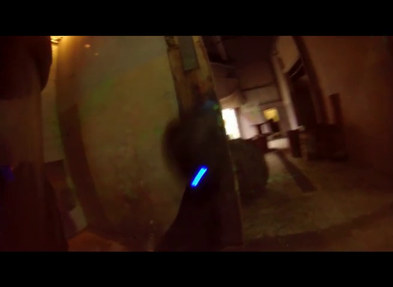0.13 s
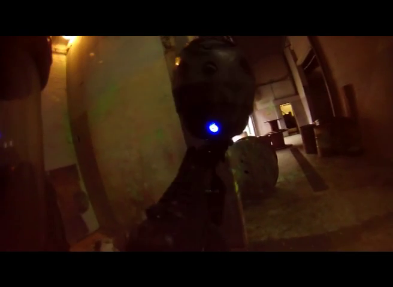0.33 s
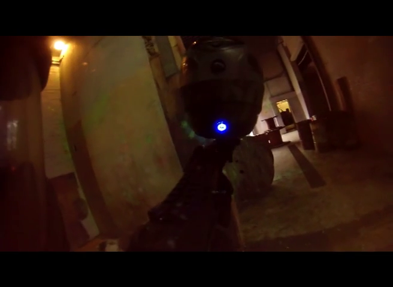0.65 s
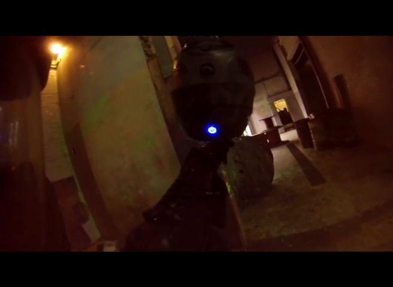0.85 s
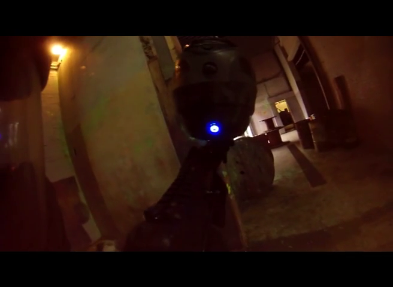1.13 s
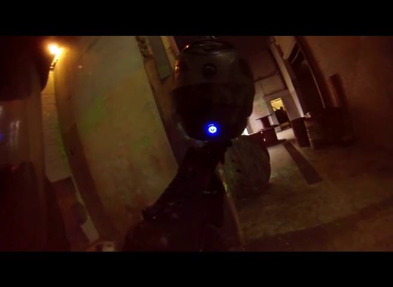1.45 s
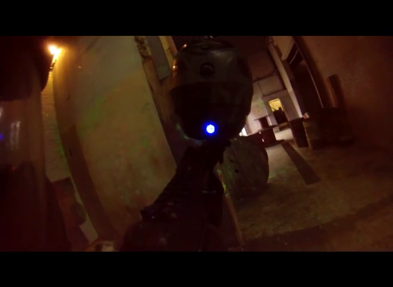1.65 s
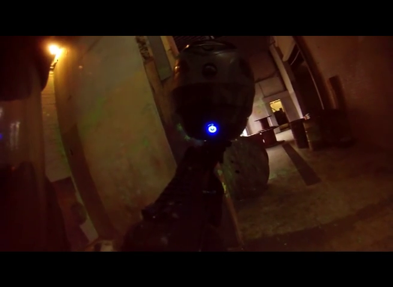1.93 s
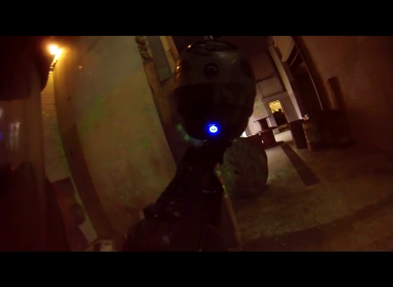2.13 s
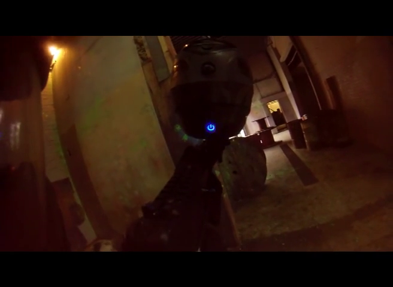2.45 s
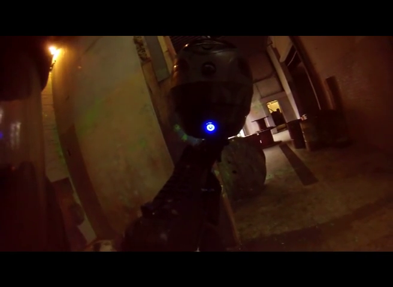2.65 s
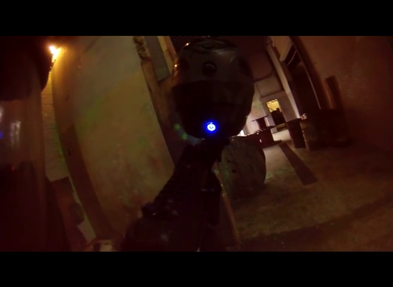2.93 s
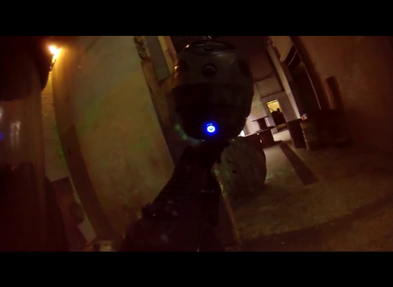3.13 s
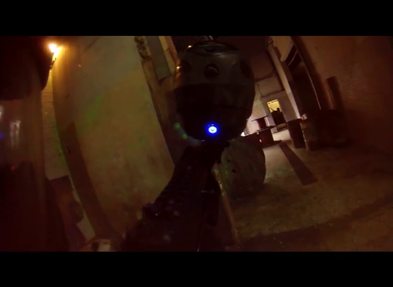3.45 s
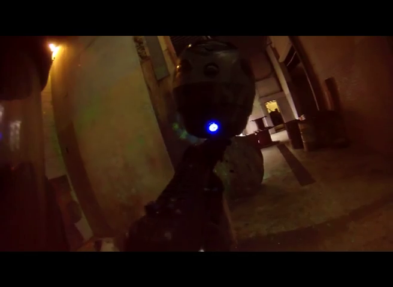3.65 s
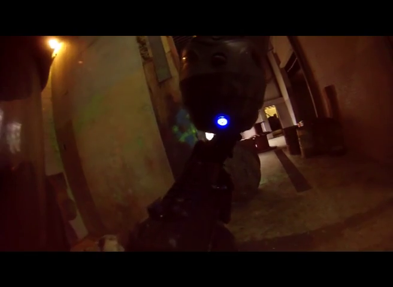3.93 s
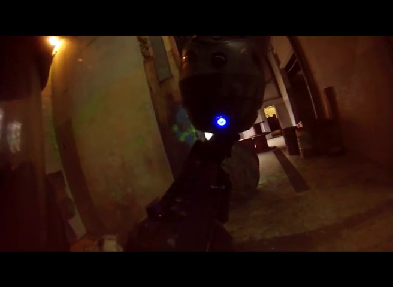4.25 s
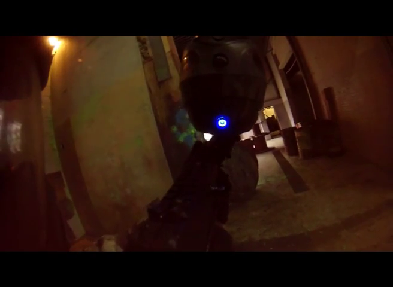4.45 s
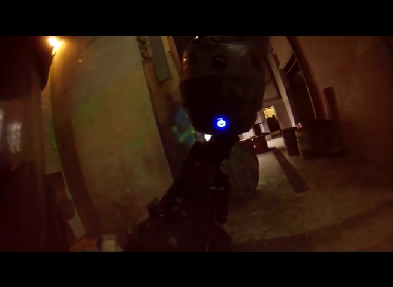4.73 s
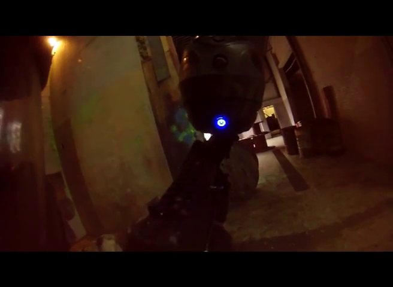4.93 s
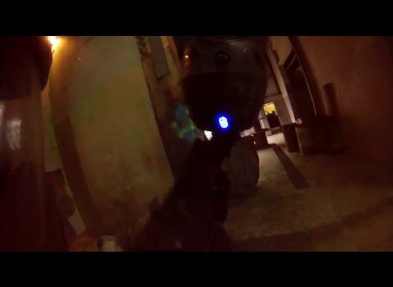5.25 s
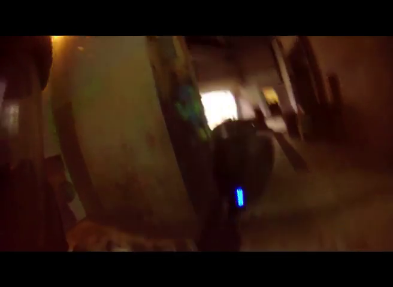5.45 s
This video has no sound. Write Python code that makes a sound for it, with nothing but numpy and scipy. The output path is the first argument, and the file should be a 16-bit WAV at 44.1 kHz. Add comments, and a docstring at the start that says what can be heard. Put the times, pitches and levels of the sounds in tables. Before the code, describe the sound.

In a large, echoing hall, distant paintball fire pulses softly over a faint hiss and light handling bumps. Then a marker next to the microphone fires two quick shots and ten more at an even, slightly slowing pace. Every shot is a hard crack of air that overloads the microphone, joined by the click and knock of the bolt and a dull shudder of the mount. The far firing thins toward the end.

```python
"""Paintball marker in an indoor arena

Twelve single shots, right beside a cased camera on a hand-held mount. In each, the sear clicks, the air
blast bounces in the barrel and overloads the microphone, the bolt knocks back and the next ball ticks
into the breech. The kicks shake the mount. Far across the large hall, strings of fire pile up into
a pulsing din, which dies away near the end."""
import sys
import numpy as np
from scipy import signal
from scipy.fft import rfft, irfft
from scipy.io import wavfile

SR = 44100
rng = np.random.default_rng(int(sys.argv[2]) if len(sys.argv) > 2 else 0)


def int16_out(signal):
    """Quantize to a 16-bit WAV file."""
    q = np.round(np.clip(np.atleast_2d(signal).T, -1, 1) * 32767)
    wavfile.write(sys.argv[1], SR, q.astype(np.int16))


N = 246959

# shots beside the microphone: blast t/s, relative level/dB, bolt stop t/s, its relative kick/dB
SHOTS = [(0.6157, 4.5, 0.6416, -1), (0.8474, 5, 0.8673, -3), (1.2707, 5, 1.3002, 1.5),
         (1.6619, 3.5, 1.6846, -1), (2.025, 4.5, 2.0482, 0), (2.4189, 4.5, 2.4486, 1.5),
         (2.86, 6, 2.8819, 0.5), (3.3924, 5.5, 3.4151, -2.5), (3.8981, 7, 3.9166, 1),
         (4.3605, 5.5, 4.3815, 0.5), (4.7969, 5, 4.822, -2), (5.2616, 3, 5.2902, -23)]
# the blast and its returns along the barrel: delay t/s, relative level/dB, high-pass f/Hz, low-pass f/Hz
BARREL_BOUNCES = [(0, 7.5, 3150, 2960), (.00235, 5, 152, 2280), (.00505, -2.5, 150, 12000),
                  (.00765, -9.5, 1000, 4930)]
# resonances of the air blast: f/Hz, relative level/dB, t60/s
BLAST_MODES = [(598, -15, 0.0079), (873, -8.5, 0.016), (968, -3.5, 0.013), (1423, -12, 0.04),
               (1805, -11.5, 0.02), (2517, -7, 0.0069), (3048, -1.5, 0.0074), (2540, -13.5, 0.0068),
               (502, -24.5, 0.055), (3245, -14.5, 0.02)]
# bright edge of contacts and escaping air, close up: f/Hz, gain/dB
CRACK_SPECTRUM = [(100, -24), (700, -42.5), (2000, 0), (3200, 13), (4300, -8.5), (5200, -10), (6500, -22),
                  (8000, -20), (11000, -30), (16000, -39.5)]
def blast(uneven_db=2.1, jitter_s=.00003):
    """The pressure pulse leaves the muzzle, returns after each barrel trip and trails turbulent air."""
    times, db, *_ = np.transpose(SHOTS)
    air = np.zeros(N)
    for trip, (delay_s, bounce_db, low_hz, high_hz) in enumerate(BARREL_BOUNCES):
        strength, late = rng.standard_normal((len(times), 2)).T
        exits = clicks(times + delay_s + trip * jitter_s * late, db + bounce_db + uneven_db * strength)
        air += high_pass(low_pass(exits, high_hz, order=1), low_hz, order=1)
    jet = bursts(clicks(times, db + 8), rise_s=0.00047, t60=0.03)
    pop = low_pass(ring(air, BLAST_MODES, sign=-0.91), 13000, order=4)
    return pop + from_db(-17.5) * air + coloured(jet, CRACK_SPECTRUM)


SEAR_LEAD_S = .0159
# the marker's body, at close range: f/Hz, relative level/dB, t60/s
BODY_MODES = [(417, -14, 0.018), (1160, -4, 0.0048), (1400, -3, 0.0062), (1860, 1.5, 0.0036),
              (2696, -1.5, 0.0076), (2626, -1.5, 0.0061), (3290, 1.5, 0.0032)]
# the next ball drops into the breech: t/s, relative level/dB
BALL_DROPS = [(0.7078, -48), (0.9184, -57), (1.385, -48), (1.7855, -50), (2.1428, -50), (2.5434, -51),
              (2.9966, -49), (3.5166, -49), (3.9704, -54), (4.4968, -48), (4.938, -48), (5.372, -46.5)]
def action(slide_s=0.014, rebound_s=0.0077, rebound_db=-12):
    """Sear, sliding bolt, bolt stop and falling ball ring the marker's body."""
    times, _, stop_s, _ = np.transpose(SHOTS)
    sear = clicks(times - SEAR_LEAD_S, -14 + rng.normal(0, 1.0, len(times)))
    sear = high_pass(sear + bursts(from_db(4.5) * sear, rise_s=0.00036, t60=0.029), 2900)
    catches = from_db(-19.5) * rattle(times + slide_s)
    slide = catches + bursts(catches, rise_s=.00012, t60=0.0097)
    # a bright, hissy ring near 3 kHz lingers after each shot
    ringing_tail = bursts(clicks(times + slide_s, -12.5), rise_s=0.0066, t60=0.53)
    # a faster bolt knocks harder; it rebounds once from its stop
    knock_db = -0.5 + 1.24 * bolt_speed_db(stop_s - times)
    rebound_times = stop_s + rebound_s * (.5 + rng.random(len(times)))
    stop = clicks(stop_s, knock_db) + clicks(rebound_times, knock_db + rebound_db)
    stop = low_pass(stop + bursts(from_db(-1.5) * stop, rise_s=0.00053, t60=0.0091), 3500, order=1)
    ball = from_db(27) * clicks(*np.transpose(BALL_DROPS))
    ball = high_pass(ball + bursts(from_db(3.5) * ball, rise_s=0.00022, t60=0.009), 4800)
    force = sear + slide + ringing_tail + stop + ball
    body = low_pass(ring(force, BODY_MODES, sign=-1.035), 3100, order=4)
    return body + from_db(10.5) * coloured(force, CRACK_SPECTRUM)


def rattle(times, count=6, spread_s=0.01, uneven_db=7):
    """The returning bolt catches a few times, at chance moments, on its way along the bore."""
    when, strength = rng.random((2, len(times), count))
    return clicks(times[:, None] + spread_s * when, uneven_db * (2 * strength - 1))


def bolt_speed_db(return_s, usual_s=0.019):
    """The bolt's speed against that of a usual cycle: a faster bolt returns sooner."""
    return 20 * np.log10(usual_s / return_s)


# slow swings of the mount under the microphone: f/Hz, relative level/dB, t60/s
MOUNT_MODES = [(43.8, -17, 0.25), (79.6, -8, 0.096), (183, -14.5, 0.034)]
# the case around the camera, thumped by the blast: f/Hz, relative level/dB, t60/s
CASE_MODES = [(217, -15, 0.022)]
# small bumps of handling: t/s, relative level/dB
HANDLING_BUMPS = [(0.043, -15), (0.148, -19), (0.231, -13.5), (0.322, -17), (0.353, -11.5), (3.685, -12),
                  (4.944, -18), (5.576, -16)]
def mount():
    """Bolt start and recoil shove the mount back, the stop kicks it on; the case thumps and shudders."""
    times, blast_db, stop_s, kick_db = np.transpose(SHOTS)
    recoil_db = 0.59 * bolt_speed_db(stop_s - times)   # a faster bolt recoils more
    start = push(clicks(times - SEAR_LEAD_S - .001, recoil_db - 7.5), length_s=0.0046)
    recoil = push(clicks(times + 0.004, recoil_db - 2), length_s=0.013)
    stop = push(clicks(stop_s, kick_db + 2.5), length_s=0.0047)
    bumps = push(clicks(*np.transpose(HANDLING_BUMPS)), length_s=.008)
    swing = high_pass(ring(stop - start - recoil + bumps, MOUNT_MODES), 29.0)
    shudder = bursts(clicks(times + 0.0035, recoil_db + 0.35 * kick_db + 35), rise_s=0.0091, t60=0.082)
    shudder = high_pass(low_pass(shudder, 254.0, order=6), 141.6, order=4)
    thump = ring(clicks(times + 0.0023, blast_db + 0.12 * kick_db), CASE_MODES)
    return swing + shudder + thump


# the arena's reverberation, from where the marker stands: f/Hz, t60/s
HALL_T60 = [(200, 3.6), (1200, 0.95), (3000, 0.81), (8000, 2.9), (16000, 0.63)]
def hall(x):
    """Near walls answer at once; the far hall adds a long smooth tail that dies band by band."""
    t = np.arange(2 * SR) / SR
    onset = 1 - np.exp(-t / 0.012)
    edges_hz = np.geomspace(120, 16000, 9)
    tail = 0
    for low, high in zip(edges_hz, edges_hz[1:]):
        band_pass = signal.butter(2, [low, high], "band", fs=SR, output="sos")
        band = signal.sosfilt(band_pass, rng.standard_normal(len(t)))
        tail = tail + band * from_db(-60 * t / at_hz(HALL_T60, np.sqrt(low * high)))
    tail = low_pass(tail * onset, 1670, order=1)
    near = low_pass(high_pass(rng.standard_normal(len(t)), 250), 3000)
    near *= onset * from_db(-60 * t / 0.11)
    response = from_db(-23.5) * rms_one(tail) + from_db(-23.0) * rms_one(near)
    return signal.fftconvolve(x, response / np.sqrt(len(t)))[:N]


# strings of fire from markers far across the arena: first shot t/s, last shot t/s, relative level/dB
FAR_STRINGS = [(-1.37, 0.566, -2), (0.714, 1.469, -1), (1.62, 2.224, 2), (2.32, 2.745, -1),
               (2.88, 3.17, 0.5), (3.33, 3.66, -1.5), (3.83, 4.11, 1), (4.25, 4.57, 1), (4.73, 4.73, -20),
               (5.38, 5.53, -5.5)]
# colour of that fire as it reaches the microphone: f/Hz, relative level/dB
FAR_SPECTRUM = [(76, -32), (130, -0.5), (191, -10.5), (274, 0.5), (350, -3), (440, -13), (601, -7),
                (812, -4), (974, -4), (1190, 1.5), (1490, -2.5), (1820, -3), (2180, -7), (2830, -9),
                (4320, -29), (4880, -25.5), (6500, -40.5), (8200, -40.5), (11000, -51.5), (16000, -70)]
# how long a far shot hangs in the hall: f/Hz, t60/s
FAR_T60 = [(300, 2.5), (1500, 1.87), (4000, 1.9), (8000, 1.1)]
def far_fire(shots_per_s=6.6, swell_s=0.008):
    """Far shots arrive only as reverberation: each swells and dies, treble first, piling into a din."""
    shots = [(s, db) for first, last, db in FAR_STRINGS
             for s in np.linspace(first, last, round((last - first) * shots_per_s) + 1)]
    times, db = np.transpose(shots)
    t = np.arange(0, N, 100) / SR
    age = np.maximum(t - times[:, None], 0)
    spectrum = rfft(rms_one(coloured(rng.standard_normal(N), FAR_SPECTRUM)))
    centres_hz, t60s = np.transpose(FAR_T60)
    din = np.zeros(N)
    for t60, share in zip(t60s, np.eye(len(t60s))):
        band = irfft(spectrum * at_hz(np.c_[centres_hz, share], np.fft.rfftfreq(N, 1 / SR)), N)
        swells = (1 - np.exp(-age / swell_s)) * from_db(db[:, None] - 60 * age / t60)
        envelope = rms_one(np.linalg.norm(swells, axis=0))   # the shots add in power
        din += band * np.interp(np.arange(N) / SR, t, envelope)
    return from_db(-35) * din


# steady hiss under everything: f/Hz, relative level/dB
HISS_SPECTRUM = [(100, -4), (300, 1), (600, -4.5), (1200, -4.5), (3000, -4.5), (4500, -24), (8000, -41),
                 (16000, -46)]
# rumble of the hand-held mount, right at the microphone: f/Hz, relative level/dB
RUMBLE_SPECTRUM = [(15, -22), (35, -1), (70, -10.5), (120, -6), (200, -31.5), (500, -65)]
def background(waver_db=1.5, lumpy_db=4.0):
    """The din of far fire wavers over a steady hiss and a lumpy rumble."""
    din = from_db(waver_db * drift(24.98)) * far_fire()
    hiss = from_db(-46.5) * rms_one(coloured(rng.standard_normal(N), HISS_SPECTRUM))
    lumps = from_db(-45.5 + lumpy_db * drift(12))
    rumble = lumps * rms_one(coloured(rng.standard_normal(N), RUMBLE_SPECTRUM))
    return din + hiss + rumble


def from_db(db):
    """Decibels to gain."""
    return 10 ** (np.asarray(db) / 20)


def rms_one(x):
    """Scale to unit rms."""
    return x / np.sqrt(np.mean(x ** 2) + 1e-20)


def at_hz(points, hz):
    """Read a table on a log-frequency axis."""
    known_hz, values = np.transpose(points)
    return np.interp(np.log(np.maximum(hz, 1)), np.log(known_hz), values)


def low_pass(x, hz, order=2):
    """Take the edge off."""
    return signal.sosfilt(signal.butter(order, hz, fs=SR, output="sos"), x + 1e-18)


def high_pass(x, hz, order=2):
    """Take the weight out."""
    return signal.sosfilt(signal.butter(order, hz, "high", fs=SR, output="sos"), x + 1e-18)


def coloured(x, spectrum, size=8192):
    """Causal (minimum-phase) filter with the given spectrum."""
    gain = from_db(at_hz(spectrum, np.fft.rfftfreq(size, 1 / SR)))
    cepstrum = irfft(np.log(gain))
    cepstrum[1:size // 2] *= 2
    cepstrum[size // 2 + 1:] = 0
    return signal.fftconvolve(x, irfft(np.exp(rfft(cepstrum))))[:N]


def clicks(times, db):
    """One impulse per event."""
    out = np.zeros(N)
    out[np.clip(np.round(times * SR).astype(int), 0, N - 1)] = from_db(db)
    return out


def bursts(hits, rise_s, t60):
    """Each impulse releases fresh noise of about its own energy, which swells and dies."""
    t = np.arange(SR // 2) / SR
    shape = ((1 - np.exp(-t / rise_s)) * from_db(-60 * t / t60)) ** 2
    power = signal.fftconvolve(hits ** 2, shape / shape.sum())[:N]
    return np.sqrt(np.abs(power)) * rng.standard_normal(N)


def ring(force, modes, sign=1):
    """Decaying sines, mode k scaled by sign ** k: if negative, neighbours start in opposite directions."""
    out = np.zeros(N)
    for k, (hz, db, t60) in enumerate(modes):
        decay, angle = from_db(-60 / (t60 * SR)), 2 * np.pi * hz / SR
        feedback = [1, -2 * decay * np.cos(angle), decay * decay]
        out += sign ** k * from_db(db) * signal.lfilter([0, np.sin(angle)], feedback, force + 1e-18)
    return out


def push(hits, length_s):
    """Spread each impulse into a smooth shove."""
    t = np.arange(SR // 20) / SR
    shape = np.sin(np.pi * np.minimum(t / length_s, 1)) ** 2
    return signal.fftconvolve(hits, shape / shape.sum())[:N]


def drift(per_s):
    """A slow wander between random values of spread 1."""
    knots = rng.standard_normal(int(per_s * N / SR) + 2)
    return np.interp(np.arange(N) / SR * per_s, np.arange(len(knots)), knots)


def scene():
    """In mono: the marker up close, the shaking mount and the arena around them."""
    marker = blast() + action()
    return (marker + hall(marker) + mount() + background())[None]


def record(dry, hardness=8, cutoff_hz=16000):
    """This close, the blasts overload the microphone and flatten against full scale; the top is cut."""
    clipped = dry / (1 + np.abs(dry) ** hardness) ** (1 / hardness)
    return signal.sosfilt(signal.ellip(10, .1, 80, cutoff_hz, fs=SR, output="sos"), clipped)


dry = scene()
out = record(dry)
int16_out(out)
```